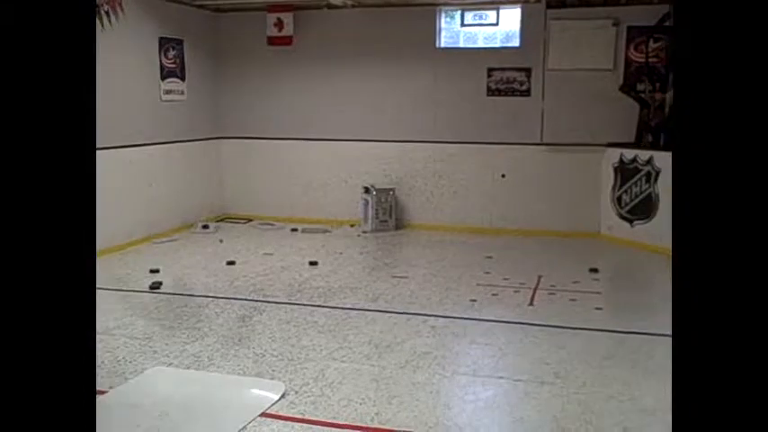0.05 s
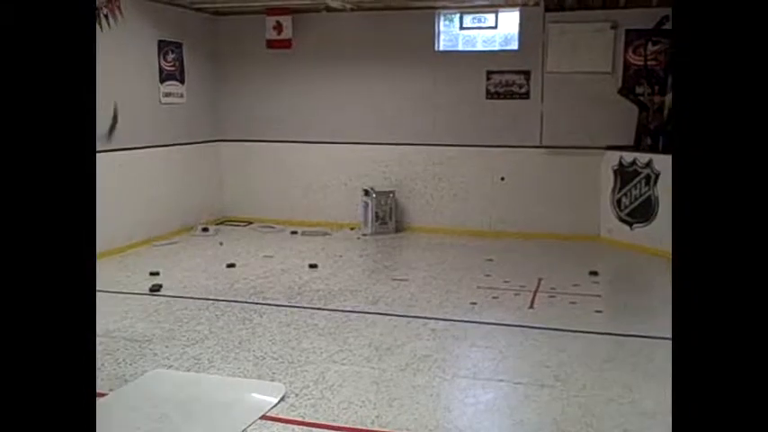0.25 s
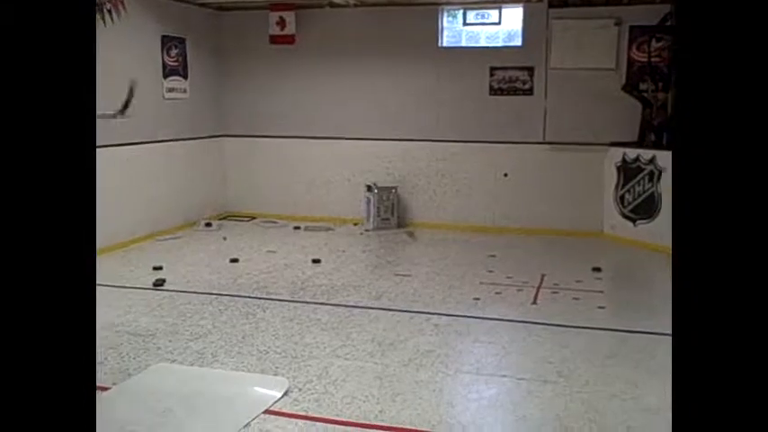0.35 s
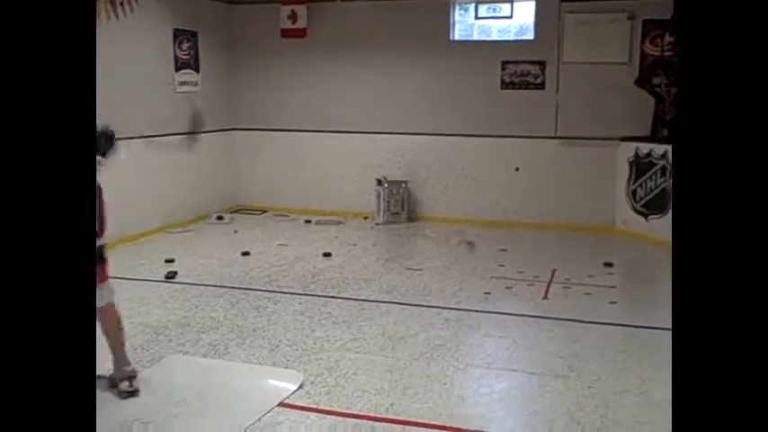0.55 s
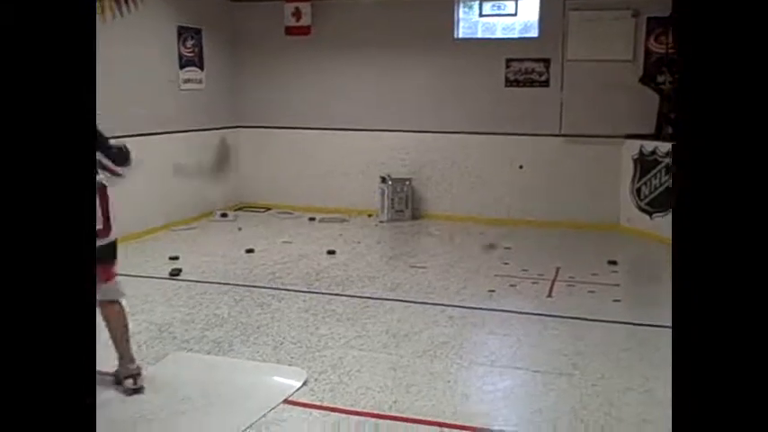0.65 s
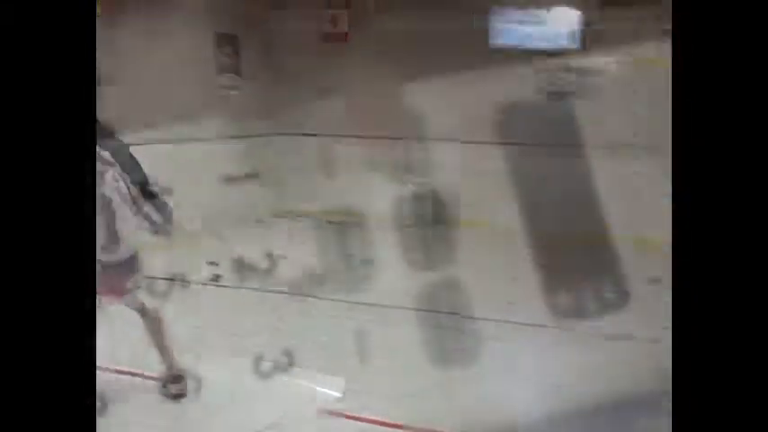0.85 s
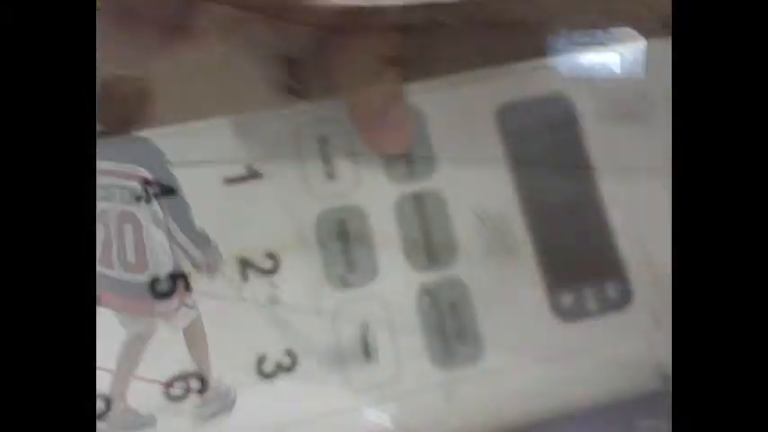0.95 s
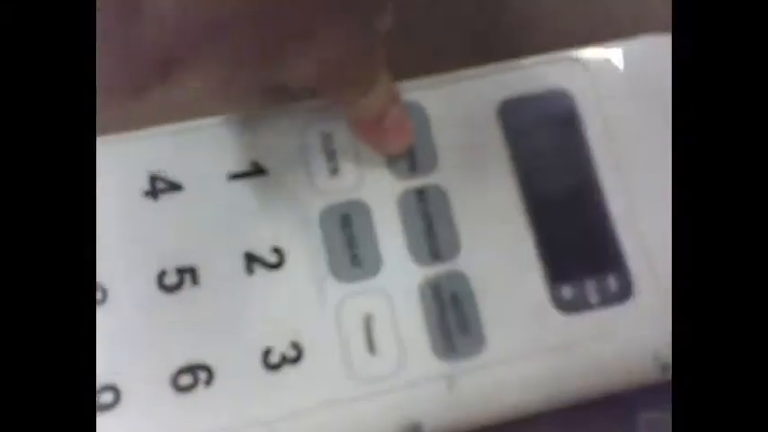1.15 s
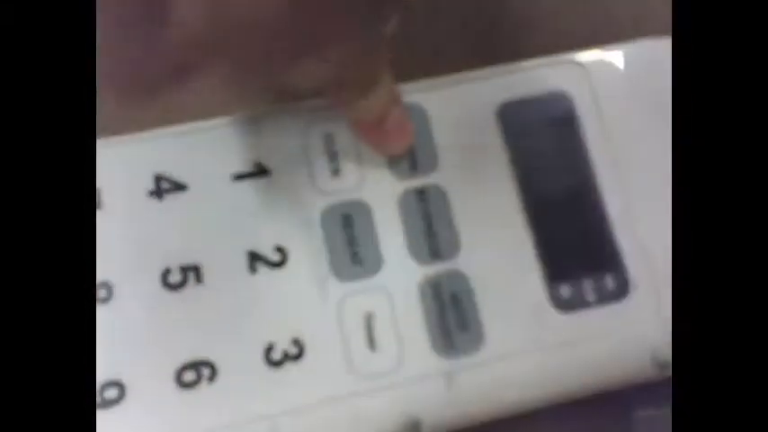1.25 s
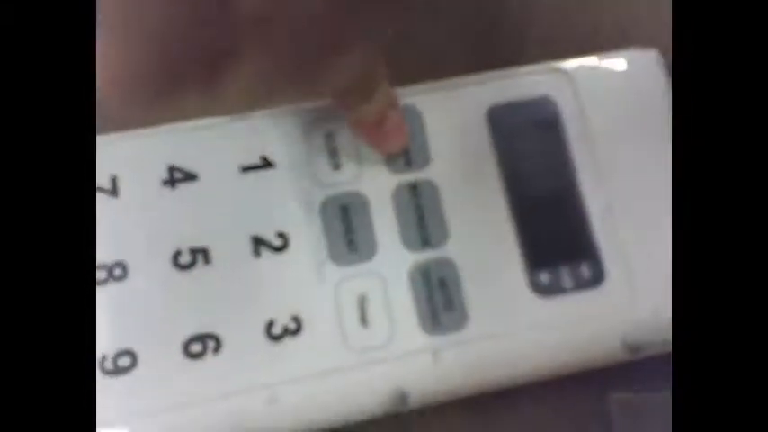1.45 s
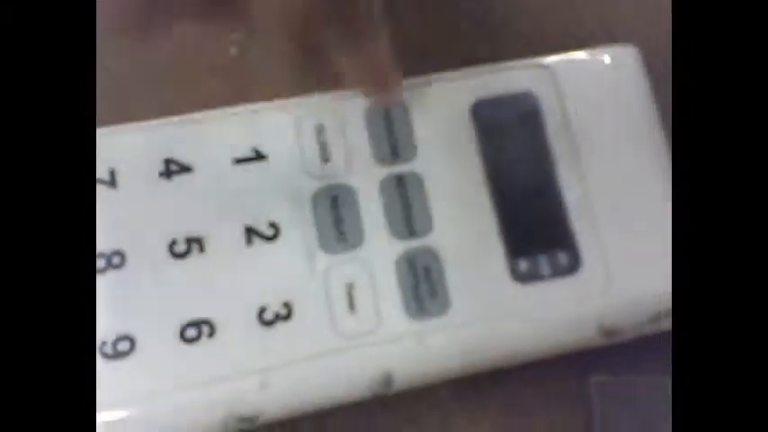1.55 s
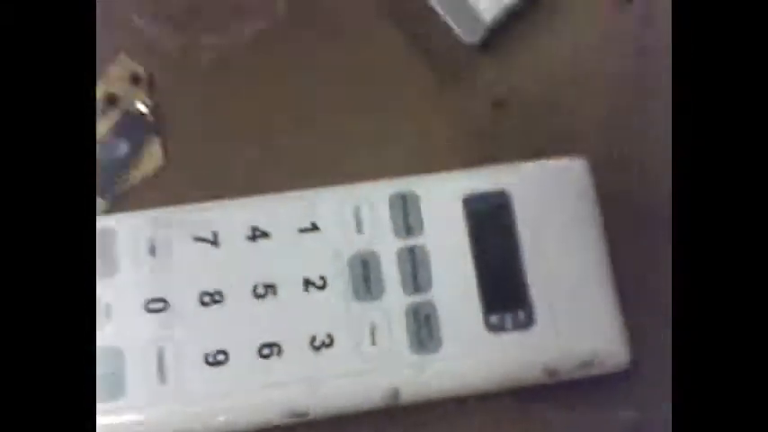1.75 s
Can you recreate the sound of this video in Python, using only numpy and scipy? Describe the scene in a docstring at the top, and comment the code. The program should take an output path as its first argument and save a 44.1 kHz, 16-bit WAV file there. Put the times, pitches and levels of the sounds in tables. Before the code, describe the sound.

Loud hockey shot: sharp stick crack and puck boom indoors, followed by faint plastic handling.

```python
"""A bare basement ice hockey rink, with ventilation running. A stick sweeps the puck over a plastic
shooting pad and cracks down on it; a quarter second later the puck booms into the far boards.
Pad and boards ring, the hard room rings on, and both hits overload the microphone.
Then a cut to a quiet, duller close-up: fingers rustle on a plastic handset and make its case click."""
import sys
import numpy as np
from scipy import signal
from scipy.fft import rfft, irfft
from scipy.io import wavfile

SR = 44100
rng = np.random.default_rng(int(sys.argv[2]) if len(sys.argv) > 2 else 0)


def master(y):
    """Save y as 16-bit WAV."""
    cut = np.clip(np.atleast_2d(y).T, -1, 1)
    pcm = np.round(cut * 32767)  # scale
    wavfile.write(sys.argv[1], SR, pcm.astype(np.int16))


N = 79380

# ventilation bed: freq_hz, density_db
AIR_COLOUR = [(25, -6.5), (85, 1), (200, -11.5), (350, -9.5), (650, -13), (1100, -15), (2100, -20),
              (4000, -33), (8000, -49), (14000, -52.5)]
# fan whine: pitch_hz, level_db
FAN_PARTIALS = [(353, -57.5), (648, -59), (2115, -63.5)]
# reverb time of the room: freq_hz, t60_s
ROOM_DECAY = [(60, .7), (150, 1.1), (300, 1.05), (700, 1.0), (1500, .9), (3000, .78), (5500, .62),
              (9000, 0.42), (14000, .45)]
# level ride of the finger rustle: time_s, level_db
RUSTLE_RIDE = [(1.30, -55.5), (1.325, -50), (1.37, -51.5), (1.45, -53.5), (1.535, -53.5), (1.578, -48),
               (1.63, -53.5), (1.68, -50.5), (1.705, -47.5), (1.735, -43.5), (1.8, -43.5)]
# rustle under a light and a firm grip: freq_hz, density_db
SOFT_GRIP_COLOUR = [(30, -7), (200, -7.5), (500, -4), (1300, -1.5), (2500, -4), (4000, -4.5), (6000, -4.5)]
FIRM_GRIP_COLOUR = [(30, -12), (200, -7), (520, -6.5), (780, 1.5), (1050, -3), (1500, -1), (1800, 7),
                    (2150, 1.5), (2500, 3), (3100, -0.5), (4500, -3.5), (6000, -5.5)]
# handset clicks: start_s, level_db, knock_share
CASE_CLICKS = [(1.545, -38.5, 0.06), (1.552, -42, 0), (1.7089, -33, 0.68), (1.711, -31.5, 0.92),
               (1.727, -38.5, 0.6)]
# ring of the handset case, the pad and the boards: pitch_hz, relative_db, t60_s
CASE_RING = [(450, -14, 0.0086), (778, 8, 0.023), (1290, -7, 0.028), (2680, -8.5, 0.011)]
PAD_RING = [(601, 0.5, 0.83), (762, -2, 0.66), (1141, 3, 0.49), (1136, 3, .55), (1296, -4, .5),
            (1686, -0.5, 0.38), (1775, -1, 0.83), (2163, -4, 0.66), (2230, -3.5, 0.19), (2410, -1, .45),
            (2643, -6.5, 0.74), (2900, -0.5, .4), (3757, -1.5, 0.51), (5220, -5.5, .35)]
BOARD_RING = [(196, 3, 0.2), (224, -5, .45), (319, -4, 0.86), (354, -11.5, 1.1), (478, -7, 0.29),
              (486, 4, 0.72), (696, -6.5, 0.88), (915, -8.5, 1.2)]
# tone of the puck's slide, panel thud, stick crack and board boom: freq_hz, density_db
SLIDE_COLOUR = [(30, -9), (350, 3.5), (650, -0.5), (1100, -5), (1850, -7.5), (2100, 0.5), (2300, -7),
                (4000, -12.5), (8000, -19), (14000, -37)]
THUD_COLOUR = [(25, -9), (85, -1), (130, -5), (300, -20), (1000, -51), (15000, -82.5)]
CRACK_COLOUR = [(30, -25), (85, -19.5), (150, -17), (210, -12.5), (330, -15.5), (450, -5), (650, 1.5),
                (900, -5), (1150, 1), (1450, -3.5), (2700, -2.5), (3600, -6.5), (5500, -11), (9500, -17),
                (15000, -26)]
BOOM_COLOUR = [(30, -32), (70, -10.5), (130, -9.5), (205, -2.5), (270, -5), (325, 3.5), (400, -7),
               (500, -0.5), (800, -4), (1300, -5), (2000, -9), (2900, -9.5), (4000, -13), (6500, -16),
               (9500, -21.5), (15000, -28.5)]
# blows of stick on pad and puck, then of puck on boards: start_s, relative_db, low_cut_hz
STICK_BLOWS = [(.2160, -21.5, 609.5), (.2198, -3.5, 897), (.2345, 0.5, 60)]
PUCK_BLOWS = [(.4875, -0.5, 151.3), (.4945, 1, 50)]

CRACK_S = STICK_BLOWS[1][0]  # the blade's first hard blow
SWELL_S, FIRST_ECHOES_S = 0.0029, 0.034
CUT_S, CUT_FADE_S = 1.30, 0.0067


def amp(db):
    """Decibels to gain."""
    return 10 ** (np.asarray(db) / 20)


def read(points, hz):
    """Reads a table on a log-frequency axis."""
    freqs, values = np.transpose(points)
    return np.interp(np.log(hz + 1), np.log(freqs + 1), values)


def fade(t, t60_s):
    """Falls by 60 dB in t60_s."""
    return np.exp(-np.log(1000) * t / t60_s)


def sine(t, hz):
    """A tone with a random starting phase."""
    return np.sin(2 * np.pi * (hz * t + rng.random()))


def add(mix, start_s, sound):
    """Lays a sound into the mix."""
    part = mix[round(start_s * SR):][:len(sound)]
    part += sound[:len(part)]


def colour(x, curve, size=4096):
    """Minimum-phase EQ, scaled to unit power gain."""
    gain = amp(read(curve, abs(np.fft.fftfreq(size, 1 / SR))))
    gain /= np.sqrt(np.mean(gain ** 2))
    response = np.exp(np.conj(signal.hilbert(np.log(gain))))
    taps = np.fft.ifft(response).real[:size // 2]
    return signal.fftconvolve(x, taps)[:len(x)]


def low_pass(x, hz):
    """Steep high cut."""
    return signal.fftconvolve(x, signal.firwin(401, hz, window=("kaiser", 8), fs=SR), "same")


def ventilation(t, air_db=-50.5):
    """A steady bed of moving air with faint fan tones."""
    fan = sum(amp(db) * sine(t, hz) for hz, db in FAN_PARTIALS)
    return amp(air_db) * colour(rng.standard_normal(N), AIR_COLOUR) + fan


def handset(t, knock_rise_s=0.00047, tick_t60_s=0.0075):
    """Fingers slide on the plastic case, more resonant as they press harder, and make it click."""
    level_db = np.interp(t, *np.transpose(RUSTLE_RIDE))
    grip = (level_db - level_db.min()) / np.ptp(level_db)
    soft = colour(rng.standard_normal(N), SOFT_GRIP_COLOUR)
    firm = colour(rng.standard_normal(N), FIRM_GRIP_COLOUR)
    handling = amp(level_db) * (np.sqrt(1 - grip) * soft + np.sqrt(grip) * firm)
    age = t[:SR // 10]
    knock = sum(amp(db) * fade(age, t60) * np.sin(2 * np.pi * hz * age) for hz, db, t60 in CASE_RING)
    knock *= 1 - np.exp(-age / knock_rise_s)
    for start_s, db, knock_share in CASE_CLICKS:
        tick = colour(rng.standard_normal(len(age)) * fade(age, tick_t60_s), FIRM_GRIP_COLOUR)
        add(handling, start_s, amp(db) * (tick + knock_share * knock))
    return low_pass(handling, hz=6050)


def puck_sweep(t, level_db=-53.5):
    """The blade slides the puck over the pad, plastic on plastic, until it strikes."""
    return amp(level_db) * (t < CRACK_S) * colour(rng.standard_normal(N), SLIDE_COLOUR)


def room_tail(t, bands=16):
    """Diffuse echoes swell quickly, each band dying at its own speed."""
    hz, centres = np.fft.rfftfreq(N, 1 / SR), np.geomspace(50, 15000, bands)
    noise_spectrum, tail = rfft(rng.standard_normal(N)), np.zeros(N)
    for centre, solo in zip(centres, np.eye(bands)):
        band_gain = read(list(zip(centres, solo)), hz)
        tail += irfft(noise_spectrum * band_gain, N) * fade(t, read(ROOM_DECAY, centre))
    return tail * (1 - np.exp(-t / SWELL_S))


def slap_back(t, delay_s=0.084, level_db=-15.5, t60_s=0.22):
    """The far wall throws the stick's crack back, smeared into a burst of noise."""
    echo = np.zeros(N)
    add(echo, CRACK_S + delay_s, amp(level_db) * rng.standard_normal(N) * fade(t, t60_s))
    return colour(echo, CRACK_COLOUR)


def panel_thud(t, start_s, level_db, t60_s):
    """Low-end weight: the struck panel flexes once and pushes air."""
    thud = np.zeros(N)
    add(thud, start_s, amp(level_db) * colour(rng.standard_normal(N) * fade(t, t60_s), THUD_COLOUR))
    return thud


def impact(t, blows, curve, modes, crack_db, crack_t60_s, echo_db, room_db, ring_db, echoes=10):
    """Each blow gives a crack, first wall echoes and a room tail; the panel rings from the last blow."""
    hits, ring = np.zeros(N), np.zeros(N)
    for start_s, db, low_cut_hz in blows:
        crack = amp(crack_db) * rng.standard_normal(N) * fade(t, crack_t60_s)
        echo_at = (rng.random(echoes) * FIRST_ECHOES_S * SR).astype(int)
        crack[echo_at] += amp(echo_db) * rng.choice([-1, 1], echoes)
        blow = amp(db) * (crack + amp(room_db) * room_tail(t))
        low_cut = signal.butter(2, low_cut_hz, "high", fs=SR)
        add(hits, start_s, signal.lfilter(*low_cut, blow))
    tones = sum(amp(db) * fade(t, t60) * sine(t, hz) for hz, db, t60 in modes)
    add(ring, blows[-1][0], amp(ring_db) * tones * (1 - np.exp(-t / SWELL_S)))
    return colour(hits, curve) + ring


def puck_on_boards(t):
    """The deep boom of the puck slamming into the wall panel."""
    boom = impact(t, PUCK_BLOWS, BOOM_COLOUR, BOARD_RING,
                  crack_db=-7.5, crack_t60_s=0.06, echo_db=-9.5, room_db=-10, ring_db=-16)
    return boom + panel_thud(t, PUCK_BLOWS[-1][0], level_db=-22.5, t60_s=0.28)


def stick_shot(t):
    """The bright slap of the blade on pad and puck."""
    slap = impact(t, STICK_BLOWS, CRACK_COLOUR, PAD_RING,
                  crack_db=0, crack_t60_s=0.13, echo_db=8.5, room_db=-6.5, ring_db=-18)
    return slap + slap_back(t) + panel_thud(t, STICK_BLOWS[-1][0], level_db=-21.5, t60_s=0.24)


def scene():
    """The rink, then a quick cut to the handset."""
    t = np.arange(N) / SR
    rink = puck_sweep(t) + stick_shot(t) + puck_on_boards(t) + ventilation(t)
    crossfade = np.clip((t - CUT_S) / CUT_FADE_S + 0.5, 0, 1)
    return ((1 - crossfade) * rink + crossfade * handset(t))[None]


def record(dry):
    """The microphone overloads on both hits; the top octave is shelved down and band-limited."""
    ceiling, knee, shelf_db = 0.93, 7, -8.5
    clipped = dry[0] / (1 + abs(dry[0] / ceiling) ** knee) ** (1 / knee)
    body = low_pass(clipped, hz=9890)
    treble = clipped - body
    return low_pass(body + amp(shelf_db) * treble, hz=15300)[None]


dry = scene()
out = record(dry)
master(out)
```